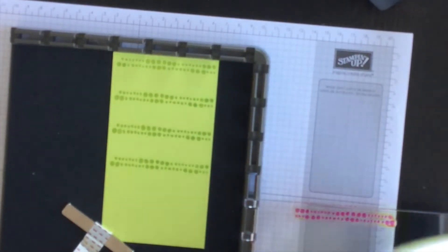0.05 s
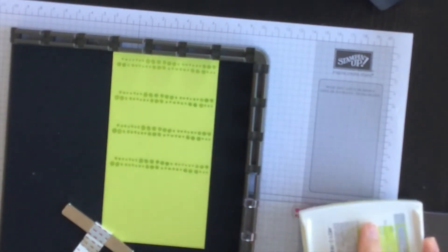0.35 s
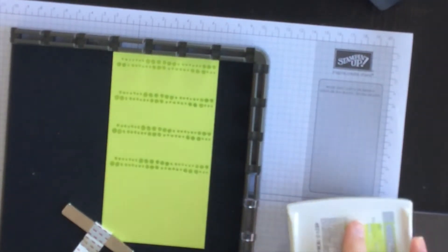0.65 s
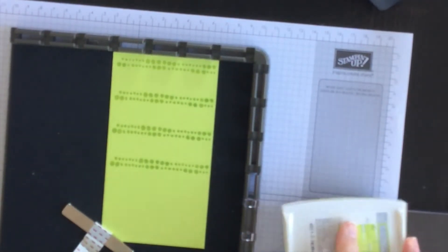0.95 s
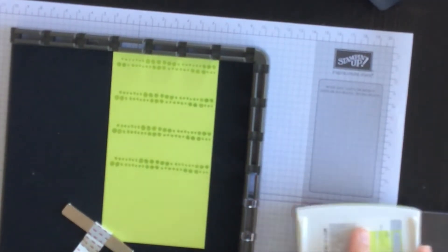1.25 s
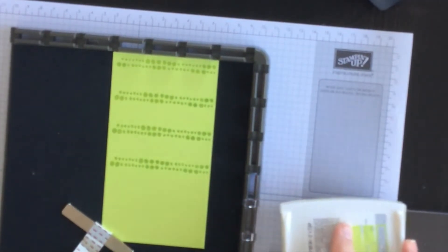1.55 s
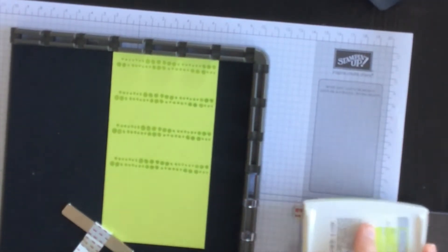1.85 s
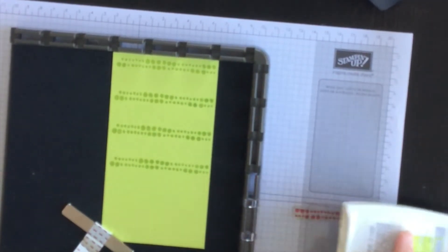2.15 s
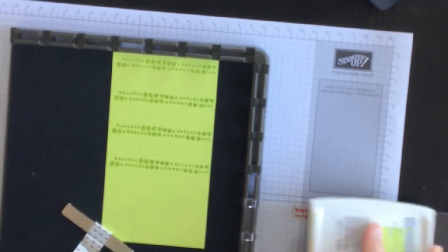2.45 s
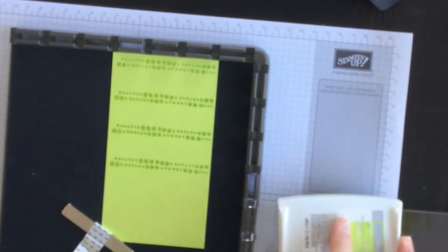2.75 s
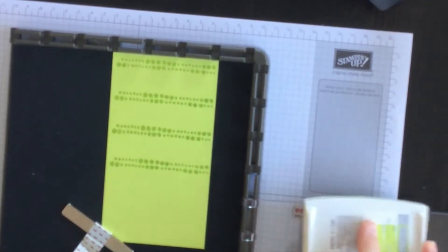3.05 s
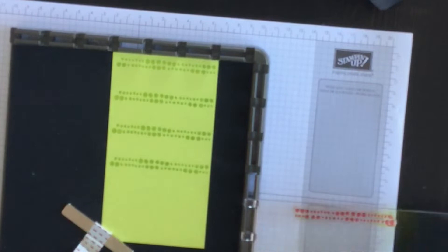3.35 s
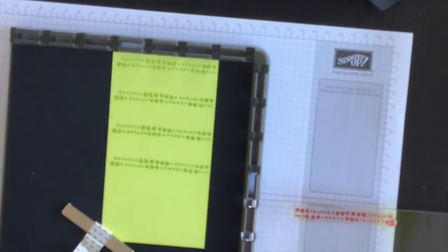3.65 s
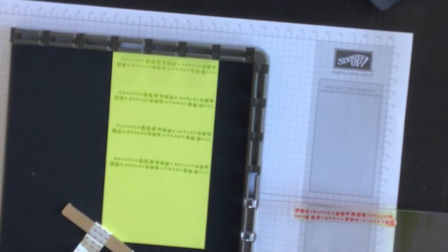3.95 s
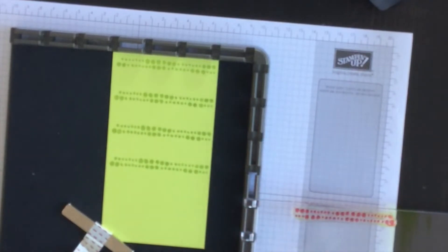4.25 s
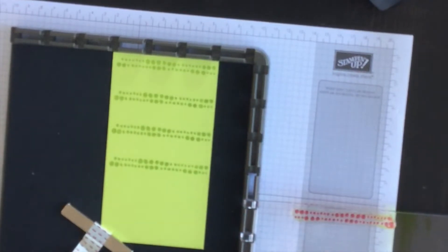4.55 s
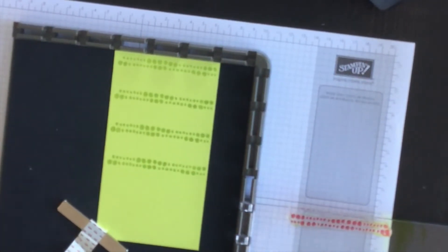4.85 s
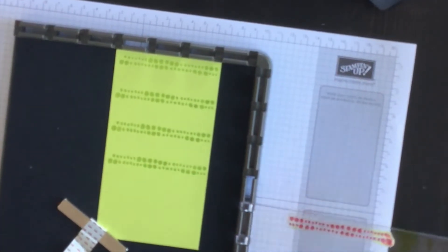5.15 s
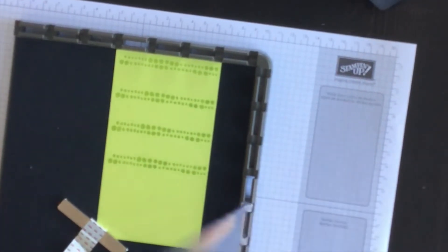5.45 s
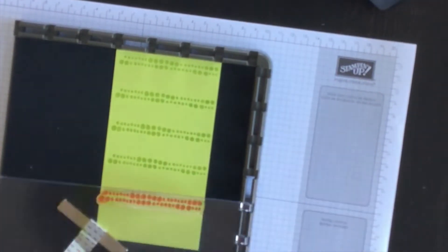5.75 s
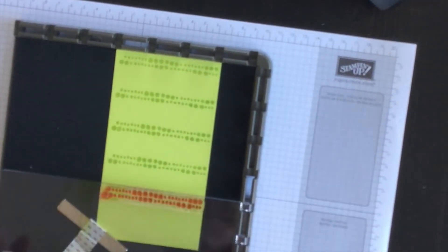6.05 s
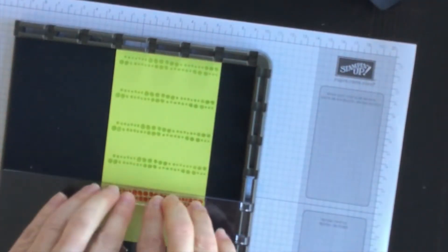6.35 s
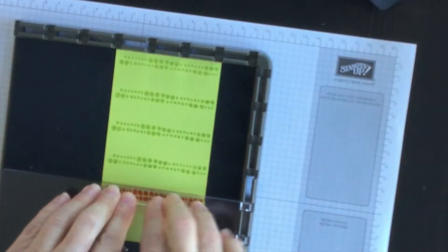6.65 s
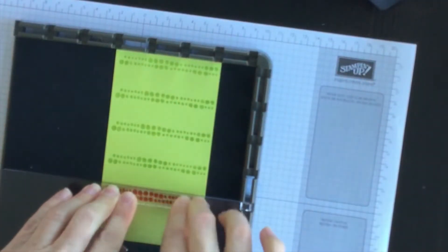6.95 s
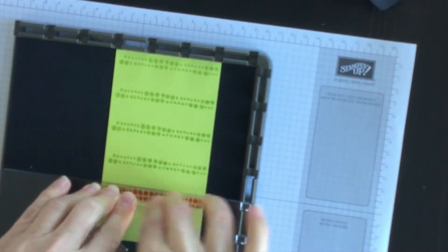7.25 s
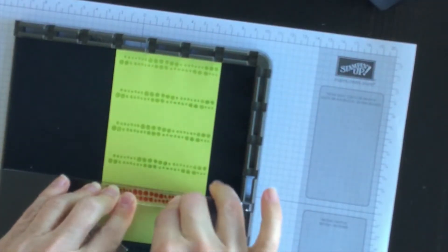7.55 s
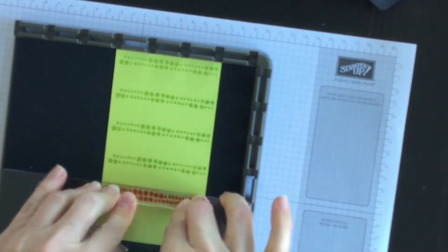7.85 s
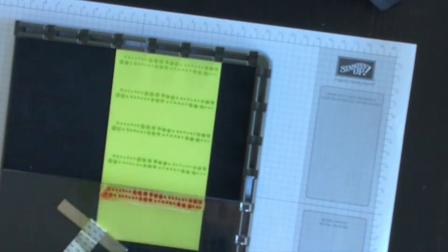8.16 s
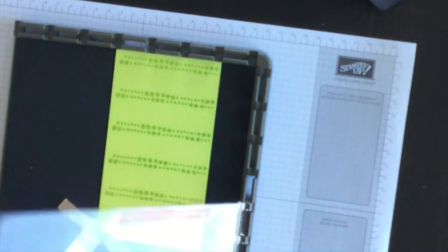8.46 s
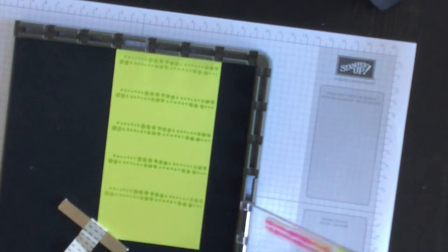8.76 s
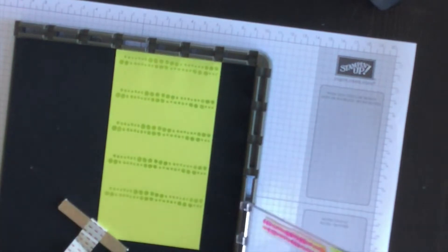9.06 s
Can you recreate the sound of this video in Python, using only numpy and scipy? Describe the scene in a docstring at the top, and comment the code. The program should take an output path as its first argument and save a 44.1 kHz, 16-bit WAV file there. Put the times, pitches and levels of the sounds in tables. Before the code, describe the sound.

A plastic ink pad is dabbed on a stamp in a quick run of taps, then softer, uneven ones, each thumping the table. The pad case is put down and snapped shut with several loud clacks. A hinged plastic plate rattles, slaps onto card, is pressed softly with the fingers and lifts with faint sticky ticks. The microphone is close above the table in a small room with light hiss.

```python
"""A plastic ink pad is dabbed on a stamp on the hinged clear plate of a stamping tool, close under one
microphone above a craft table in a small room. Off to one side the pad is put down and snapped shut.
The plate is swung over, dropped on card, pressed with the fingers and lifted, its rubber peeling away.
Each knock rings the plastic, thumps the table and carries into the room. Behind it are room air, hiss
and a faint low drone, like a far engine, that fades out in the first seconds."""
import sys
import numpy as np
from scipy import signal
from scipy.fft import rfft, irfft
from scipy.io import wavfile
from scipy.ndimage import uniform_filter1d

SR = 44100
rng = np.random.default_rng(int(sys.argv[2]) if len(sys.argv) > 2 else 0)


def inscribe(sig):
    """Save sig as 16-bit PCM at rate SR to the path in sys.argv[1].

    A 1-D sig is mono; a 2-D sig holds one channel per row.
    Samples are clipped to [-1, 1] before scaling.
    """
    pcm = np.round(np.clip(np.atleast_2d(sig).T, -1, 1) * 32767)
    wavfile.write(sys.argv[1], SR, pcm.astype(np.int16))


N = 405719

# ink pad landing on the stamp: t/s, clack level/dB, hardness (crack over clack)/dB
DABS = [(0.418, -33.5, -3), (0.633, -31.5, -6.5), (0.787, -32.5, -6.5), (0.927, -33.5, -9.5),
        (1.318, -44.5, -11), (1.548, -60, -20), (1.655, -60.5, -13), (1.805, -48.5, -20),
        (1.958, -58.5, -24.5), (2.404, -40.5, -8.5), (2.724, -42, -10), (2.874, -49.5, -19.5),
        (3.047, -44, -10.5), (3.193, -41.5, -11)]
# plate dropping back as the pad comes off it: t/s, clack level/dB
LIFTS = [(0.522, -48), (1.58, -58), (2.01, -69), (2.482, -52.5), (2.636, -59), (2.816, -53), (3.148, -58),
         (3.293, -55.5)]
# pad case snapped shut and put down: t/s, clack level/dB, hardness/dB, table thump level/dB
CASE_KNOCKS = [(3.717, -36, -15, -41.5), (3.838, -25.5, -14.5, -32.5), (3.933, -27.5, -15, -47.5),
               (3.947, -29.5, -48, -44.5), (4.083, -23, -3, -33), (4.112, -23, -14.5, -38),
               (4.588, -59.5, -11.5, -66.5), (4.755, -65.5, -13, -57.5), (4.817, -54.5, -10.5, -58)]
# pad case sliding to rest: start t/s, length/s, scrape level/dB, shudder level/dB
SLIDES = [(4.59, 0.11, -60.5, -56.5), (4.768, 0.051, -59, -42)]
# plate landing flat on the card and bouncing: t/s, clack level/dB, hardness/dB
LANDING = [(6.058, -39, -5), (6.081, -46.5, -15), (6.095, -39, -25), (6.109, -44, -13), (6.141, -45.5, -21)]
# raised plate knocking in its hinge: t/s, clack level/dB
HINGE_KNOCKS = [(5.269, -54.5), (5.297, -57), (5.32, -59), (5.457, -61.5), (5.57, -61.5), (5.624, -53),
                (6.362, -62), (8.03, -61), (8.043, -59), (8.339, -60), (8.55, -66.5), (8.603, -62.5),
                (8.622, -68), (8.691, -64.5), (9.144, -59)]
# small sounds at the tool: t/s, level/dB
PRESSES = [(6.729, -69.5), (6.776, -72.5), (7.013, -69.5), (7.078, -71), (7.294, -57)]  # fingers on the closed plate
TACKY_TICKS = [(0.522, -67.5), (1.655, -68), (6.591, -78), (7.999, -63), (8.268, -67), (9.054, -78),
               (9.144, -69)]  # tacky rubber letting go
SQUEAKS = [(5.561, -65), (5.567, -69)]  # the hinge slipping twice, very high
# sticky rubber crackling under the fingers and peeling off the card: start t/s, length/s, level/dB
PEELS = [(5.413, 0.055, -72.5), (6.548, 0.55, -89), (7.958, 0.086, -73), (8.244, 0.11, -76),
         (8.54, 0.13, -74)]
# hands shifting the tool: start t/s, length/s, rumble level/dB, rub level/dB
SHIFTS = [(5.067, 0.14, -65, -90), (5.392, 0.086, -55, -69.5), (5.549, 0.11, -50.5, -68.5),
          (6.134, 0.056, -48, -66), (6.34, 0.035, -54, -84), (8.037, 0.095, -60.5, -71),
          (8.242, 0.27, -72, -77), (8.538, .27, -54, -71.5), (9.126, 0.042, -52.5, -63.5)]
# swells of the far drone: start t/s, length/s, low tone level/dB, octave level/dB
DRONES = [(-.03, 0.186, -55.5, -56), (0.306, .55, -63, -64), (0.972, 1.05, -66, -60)]

# modes of the struck things: f/Hz, level/dB, t60/s
OPEN_PLATE_MODES = [(390.5, -6, 0.076), (670, -13, 0.06), (1072, -13, 0.081), (1123, 9, 0.02),
                    (1422, 6.5, 0.0142), (1540, 2, .014), (1940, -4.5, 0.0053), (2204, 3, 0.01),
                    (2733, 5, 0.0132), (3380, -5, 0.017), (4050, -13.5, 0.002), (5200, -21.5, 0.0014)]
FLAT_PLATE_MODES = [(420, -11, 0.059), (736, -7, 0.048), (1027, 1.5, 0.046), (1100, 3.5, 0.019),
                    (1470, -1, 0.012), (1890, 9.5, 0.0087), (2270, -20, 0.0062), (2600, -1, 0.024),
                    (3060, -31, .01), (4400, -6, 0.025)]  # lying on the card
PRESSED_PLATE_MODES = [(364, -2, 0.13), (406, -5, 0.049), (600, -5, 0.029), (680, 4, 0.019),
                       (950, -11, 0.044), (1280, -37, 0.024), (3200, -9, .006)]  # under the hands
HINGE_PIN_MODES = [(4350, 0, 0.03), (4670, 3.5, 0.015), (9600, 2, .007), (12200, 0, .007)]
PEEL_MODES = [(1250, -1.5, 0.03), (1600, -4, 0.017), (3600, -2.5, 0.0059), (4400, 1.5, .012),
              (5000, -14, 0.0073)]  # plate rung by slipping rubber
CASE_MODES = [(345, -8, 0.05), (533.6, -14, 0.012), (737, -9, 0.065), (935, -3, .03), (1087, 4, 0.038),
              (1440, 1, 0.013), (1920, 0, .016), (2490, -1, .018), (2680, -0.5, 0.015), (3110, 5, 0.013),
              (3682, -1, 0.0097), (3753, -7, 0.02), (4447, -3.5, 0.01), (4960, -3, 0.0035),
              (6400, -7.5, 0.0099)]
TABLE_MODES = [(63.6, -4, 0.29), (100.9, -2.5, 0.5), (120, -2.5, 0.5), (162, 4, 0.088), (185.7, -1, 0.2),
               (253.8, -4.5, 0.14), (294, -8.5, 0.18), (351.4, -7, 0.54)]
TABLE_EDGE_MODES = [(100.5, -19.5, 0.22), (187, -4, 0.2), (252, -8, .1), (304, -0.5, 0.46),
                    (342.4, 3, 0.15), (357.1, 5.5, 0.038), (400, -4.5, 0.12)]
TOOL_BASE_MODES = [(70, -16, .3), (97, 8, 0.3), (113, 3.5, 0.29), (153, -6, .15), (173, -1.5, 1),
                   (282, -0.5, 0.12), (367, -2, 0.17)]

# spectra of contacts, friction and the room: f/Hz, level/dB
TICK_SPECTRUM = [(2000, -29.5), (4500, -3.5), (6000, -3.5), (8200, -3.5), (10500, -7.5), (12700, -6.5),
                 (14500, -10), (16000, -17.5)]  # plastic meeting a hard surface
SCRAPE_SPECTRUM = [(300, -1.5), (700, 5), (1200, 13), (2200, -6), (4000, -11), (8000, -13), (13000, -11),
                   (16000, -14)]  # case over the table
SHUDDER_SPECTRUM = [(40, -27), (100, 0.5), (140, -3), (168, -17), (182, 18.5), (197, -2), (250, -11),
                    (360, -8), (500, -16), (900, -60)]  # table under the sliding case
TACKY_SPECTRUM = [(1000, -18), (2500, -6), (4000, -1), (6000, -9), (9500, -3), (14000, -6), (16000, -16)]  # rubber letting go
SQUEAK_SPECTRUM = [(5000, -44), (9000, -27), (12000, -10), (14300, -3), (15500, -5), (17000, -25)]  # hinge
RUMBLE_SPECTRUM = [(30, -53), (60, -9), (110, 14), (180, 7.5), (250, -7), (350, 4), (500, -14.5),
                   (900, -60)]  # tool on its mat
RUB_SPECTRUM = [(300, 2.5), (700, 10), (1150, 7.5), (1600, 2.5), (2200, -8), (3000, -18), (4300, -2.5),
                (6000, -13), (8200, -16), (14000, -16.5)]  # skin and rubber
ROOM_SPECTRUM = [(80, 9.5), (300, -0.5), (1200, -3), (3000, -1.5), (5000, -2.5), (9000, -1.5), (15000, 0.5)]  # reflections
AIR_SPECTRUM = [(15, -44.5), (25, -10.5), (92, -3), (170, -2.5), (363, -14.5), (476, -21), (1130, -23.5),
                (2110, -30), (3820, -30), (7310, -36.5), (8830, -34.5), (13600, -37.5), (16000, -62)]  # room air and microphone hiss
# decay of the small room: f/Hz, t60/s
ROOM_T60 = [(80, .85), (250, .66), (700, .55), (1840, .58), (3100, .55), (3750, .65), (4400, .5),
            (5400, .46), (8000, .38), (13000, .29)]


def dabs():
    """Right under the microphone, the pad meets the stamp and comes off it again."""
    blows = []
    for s, db, hard_db in DABS:
        # a firmer dab is much brighter, but the weight of the hand on the table hardly changes
        firm_db = db + 40  # over a usual dab of -40 dB
        tick_db = -67 + 2.97 * firm_db
        thump_db = -52.5 + 0.27 * firm_db
        blows.append((s, db, db + hard_db, tick_db, thump_db))
    blows += [blow(s, db, hard_db=-28, tick_db=-13, thump_db=-13) for s, db in LIFTS]
    return knocks(blows, OPEN_PLATE_MODES, TABLE_MODES, chatter=0.58, chatter_s=0.0031,
                  wet_db=-5, sizzle_db=0.5, boom_db=-0.5, rebound=0.88, rebound_s=0.045)


def pad_case():
    """The hollow case is handled to one side of the microphone, so more of the room is heard."""
    blows = [blow(s, db, hard_db, tick_db=-7, thump_db=table_db - db)
             for s, db, hard_db, table_db in CASE_KNOCKS]
    return knocks(blows, CASE_MODES, TABLE_EDGE_MODES, chatter=3.6, chatter_s=0.0019,
                  wet_db=-1.5, sizzle_db=-5, boom_db=-3, rebound=0.077, rebound_s=0.036)


def case_slide(grains_per_s=1500, rise_s=0.067):
    """The case scrapes over the table, which shudders as it comes to rest."""
    grit = (rng.random(N) < grains_per_s / SR) * rng.standard_normal(N)
    scrape = unit_rms(colour(grit + room(grit), SCRAPE_SPECTRUM))
    shudder = noise(SHUDDER_SPECTRUM)
    return sum(amp(scrape_db) * scrape * swell(s, length, rise_s, fall_db_per_s=220.5)
               + amp(shudder_db) * shudder * swell(s, length, rise_s, fall_db_per_s=139)
               for s, length, scrape_db, shudder_db in SLIDES)


def plate_landing():
    """The plate slaps down on the card and bounces; the first blow rings the metal hinge pin."""
    pin = np.zeros(N)
    add(pin, LANDING[0][0], amp(-47) * ring(HINGE_PIN_MODES, scatter_db=1, detune=0.003))
    blows = [blow(s, db, hard_db, tick_db=-15, thump_db=-9.5) for s, db, hard_db in LANDING]
    slap = knocks(blows, FLAT_PLATE_MODES, TOOL_BASE_MODES, chatter=0.73, chatter_s=0.0023,
                  wet_db=-8.5, sizzle_db=0, boom_db=2, rebound=0.49, rebound_s=0.05)
    return slap + pin + room(pin)


def hinge_rattle():
    """The clear plate rattles in its hinge as it is swung over and back."""
    blows = [blow(s, db, hard_db=-12, tick_db=-33, thump_db=-9.5) for s, db in HINGE_KNOCKS]
    return knocks(blows, OPEN_PLATE_MODES, TABLE_MODES, chatter=2, chatter_s=0.0052,
                  wet_db=-7.5, sizzle_db=8, boom_db=1, rebound=0.97, rebound_s=0.04)


def blow(s, db, hard_db, tick_db, thump_db):
    """Time and four levels of a knock: crack and thump are set against the clack, tick against crack."""
    return s, db, db + hard_db, db + hard_db + tick_db, db + thump_db


def knocks(blows, modes, table_modes, chatter, chatter_s, wet_db, sizzle_db, boom_db, rebound, rebound_s):
    """Each blow makes a sharp tick, a short plastic clack and crack and, just after, a table thump."""
    direct, spread, sizzle, thumps = np.zeros((4, N))  # spread and sizzle are heard only via the room
    clean_tick = burst(colour(contact(chatter=0, seconds=1), TICK_SPECTRUM), size=880)
    for s, clack_db, crack_db, tick_db, thump_db in blows:
        plastic = ring(modes, scatter_db=2, detune=0.025, size=3000)
        struck = signal.fftconvolve(plastic, contact(chatter, chatter_s))
        tick = burst(colour(contact(chatter=3, seconds=0.001), TICK_SPECTRUM), size=880)
        add(direct, s, clack_and_crack(struck, clack_db, crack_db))
        add(direct, s, amp(tick_db) * tick)
        # the room gathers the sound of all sides of the thing, which blurs its modes together
        blurred = ring(modes, scatter_db=1, detune=0.025, damping=4, size=3000)
        add(spread, s, clack_and_crack(blurred, clack_db, crack_db))
        add(sizzle, s, amp(tick_db + sizzle_db) * clean_tick)
        # the table is pushed by the blow, and once more as the weight comes off
        for delay_s, share in ((0.003, 1), (rebound_s * rng.uniform(0.73, 1), rebound)):
            thump = band(ring(table_modes, scatter_db=2, detune=0.02), 48, 520)
            add(thumps, s + delay_s, share * amp(thump_db) * burst(thump, size=1760))
    reflections = room(spread + amp(boom_db) * thumps) + room(sizzle)
    return direct + thumps + amp(wet_db) * reflections


def clack_and_crack(x, clack_db, crack_db):
    """A harder blow shifts the weight from the low modes (clack) to the high ones (crack)."""
    clack = burst(band(x, 250, 2100), size=240)
    crack = burst(band(x, 2100, 6200), size=880)
    return amp(clack_db) * clack + amp(crack_db) * crack


def ring(modes, scatter_db, detune, damping=1, size=16000):
    """Dying modes; every spot that is struck weights and bends them a little differently."""
    hz, db, t60 = np.transpose(modes)[:, :, None]
    weight, bend = rng.standard_normal((2, len(modes), 1))
    t = np.arange(size) / SR
    decay = np.exp(-np.log(1000) * damping * t / t60)
    tones = np.cos(2 * np.pi * hz * (1 + detune * bend) * t)
    return (amp(db + scatter_db * weight) * decay * tones).sum(0)


def contact(chatter, seconds, size=1024):
    """The two surfaces graze, meet with one push, and chatter briefly."""
    age = np.arange(size) / SR / seconds
    grit = rng.standard_normal(size) * np.sqrt(age) * np.exp(-age)
    force = chatter * grit / np.linalg.norm(grit)
    force[30] += 1  # the push
    return force


def fingers():
    """Dull taps of the plate, damped by the hands that lie on it."""
    out = np.zeros(N)
    soft = signal.butter(2, 1500, fs=SR, output="sos")  # a soft contact leaves out the treble
    for s, db in PRESSES:
        plate = ring(PRESSED_PLATE_MODES, scatter_db=0.84, detune=0.0081, size=4000)
        tap = signal.fftconvolve(plate, contact(chatter=0.95, seconds=0.018))
        add(out, s, amp(db) * burst(signal.sosfilt(soft, tap), size=400))
    return out + amp(-4) * room(out)


def handling():
    """The tool shifts on its mat: a low rumble, and separate tiny slips of skin and sticky rubber."""
    rumble = noise(RUMBLE_SPECTRUM)
    friction = slips(per_s=140, spread_db=3.4)
    rub = unit_rms(colour(friction + amp(-1) * room(friction), RUB_SPECTRUM))
    return sum((amp(rumble_db) * rumble + amp(rub_db) * rub)
               * swell(s, length, rise_s=0.025, fall_db_per_s=128)
               for s, length, rumble_db, rub_db in SHIFTS)


def ticks(rows, spectrum, seconds, wet_db):
    """Tiny bright slips, too light to move the plate or the table."""
    out = np.zeros(N)
    for s, db in rows:
        tick = colour(contact(chatter=7.4, seconds=seconds), spectrum)
        add(out, s, amp(db) * burst(tick, size=880))
    return out + amp(wet_db) * room(out)


def peel():
    """The stamp lets go of the card in separate little slips, each ringing the plate for a moment."""
    releases = slips(per_s=100, spread_db=6.5)
    plate = ring(PEEL_MODES, scatter_db=1, detune=0.0093, size=2000)
    crackle = unit_rms(band(signal.fftconvolve(releases, plate)[:N], 800, 5500))
    envelope = sum(amp(db) * swell(s, length, rise_s=0.011, fall_db_per_s=250) for s, length, db in PEELS)
    out = crackle * envelope
    return out + amp(-11.5) * room(out)


def slips(per_s, spread_db):
    """A sticky surface gives way in random impulses, most small and a few strong."""
    impulses = (rng.random(N) < per_s / SR) * rng.choice([-1, 1], N)
    return impulses * amp(spread_db * np.minimum(rng.exponential(1, N), 3))


def room(x, size=40000, ceiling_s=0.024):
    """The small room: dense reflections, each band dying at its own speed, and a stronger ceiling echo."""
    taps = np.zeros(size)
    slots = np.arange(200, size - 10, 10)
    taps[slots + rng.integers(0, 10, len(slots))] = rng.choice([-1., 1.], len(slots))
    taps *= 1 + 0.64 * np.exp(-((np.arange(size) / SR - ceiling_s) / 0.0022) ** 2)
    hz, t, bands = signal.stft(taps, SR, nperseg=256)
    decay = np.exp(-np.log(1000) * t / curve(ROOM_T60, hz)[:, None])
    gain = amp(curve(ROOM_SPECTRUM, hz))[:, None]
    tail = signal.istft(bands * decay * gain, SR, nperseg=256)[1]
    return signal.fftconvolve(x, tail / np.linalg.norm(tail))[:N]


def drone(start_hz=85.3, top_hz=99.7, settle_s=1.4, waver_db=4):
    """Far off, a muffled low tone and its octave creep up in pitch, waver and fade."""
    hz = top_hz + (start_hz - top_hz) * np.exp(-np.arange(N) / SR / settle_s)
    phase = 2 * np.pi * np.cumsum(hz) / SR
    drift = unit_rms(uniform_filter1d(uniform_filter1d(rng.standard_normal((2, N)), 3000), 3000))
    low, octave = unit_rms(amp(waver_db * drift) * np.sin([phase, 2 * phase]))
    return sum((amp(low_db) * low + amp(octave_db) * octave)
               * swell(s, length, rise_s=0.013, fall_db_per_s=106.5)
               for s, length, low_db, octave_db in DRONES)


def air():
    """Still room air and microphone hiss."""
    return amp(-70) * noise(AIR_SPECTRUM)


def amp(db):
    """Decibels to gain."""
    return 10 ** (np.asarray(db) / 20)


def unit_rms(x):
    """Scales to rms 1."""
    return x / np.sqrt(np.mean(x ** 2) + 1e-20)


def burst(x, size):
    """Scales a hit to rms 1 over its first samples."""
    return x / np.sqrt(np.mean(x[:size] ** 2) + 1e-20)


def curve(points, hz):
    """Joins points by straight lines over log frequency."""
    f, value = np.transpose(points)
    return np.interp(np.log(hz + 1), np.log(f + 1), value)


def colour(x, spectrum):
    """Filters by a spectrum."""
    hz = np.fft.rfftfreq(len(x), 1 / SR)
    return irfft(rfft(x) * amp(curve(spectrum, hz)), len(x))


def noise(spectrum):
    """Steady coloured noise at rms 1."""
    return unit_rms(colour(rng.standard_normal(N), spectrum))


def band(x, lo_hz, hi_hz):
    """Keeps one range of frequencies."""
    return signal.sosfilt(signal.butter(3, [lo_hz, hi_hz], "band", fs=SR, output="sos"), x)


def swell(start, length, rise_s, fall_db_per_s):
    """An envelope that rises, holds to the end of its length and dies away."""
    t = np.arange(N) / SR - start
    return np.clip(t / rise_s, 0, 1) * amp(-fall_db_per_s * np.maximum(t - length, 0))


def add(mix, s, sound):
    """Lays a sound into the mix at a time."""
    part = mix[max(round(s * SR), 0):][:len(sound)]
    part += sound[:len(part)]


def scene():
    """All sources at one microphone above the table."""
    tacky = ticks(TACKY_TICKS, TACKY_SPECTRUM, seconds=0.00066, wet_db=-8)
    squeak = ticks(SQUEAKS, SQUEAK_SPECTRUM, seconds=0.0014, wet_db=-15)
    tool = hinge_rattle() + plate_landing() + tacky + squeak + peel() + fingers() + handling()
    return (dabs() + pad_case() + case_slide() + tool + drone() + air())[None]


def record(dry, low_cut_hz=45, top_hz=15800):
    """The microphone sheds deep bass, and the highest treble is cut off."""
    thin = signal.sosfilt(signal.butter(2, low_cut_hz, "high", fs=SR, output="sos"), dry)
    band_limit = signal.firwin(255, top_hz, window=("kaiser", 9), fs=SR)
    return signal.oaconvolve(thin, band_limit[None], "same")


dry = scene()
out = record(dry)
inscribe(out)
```